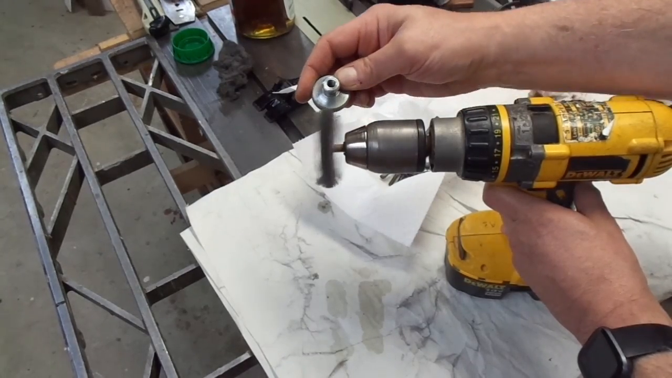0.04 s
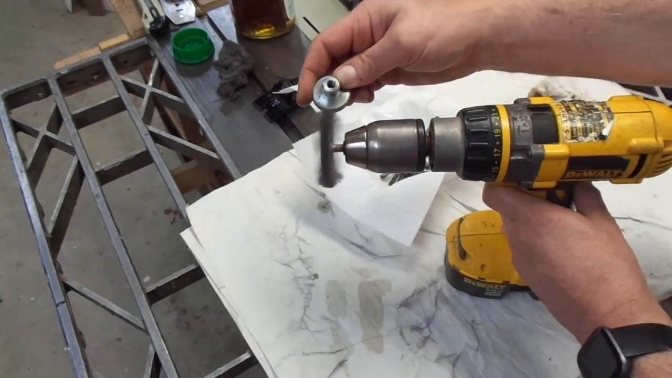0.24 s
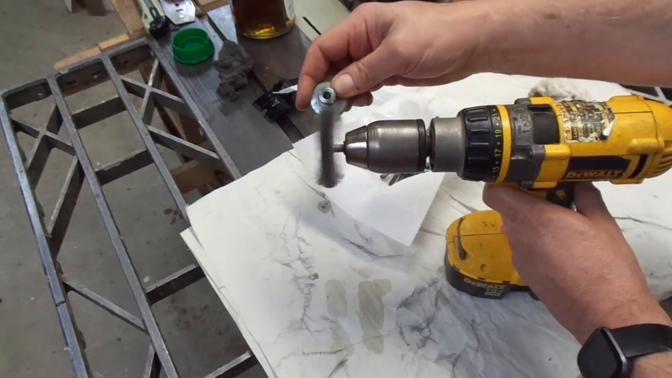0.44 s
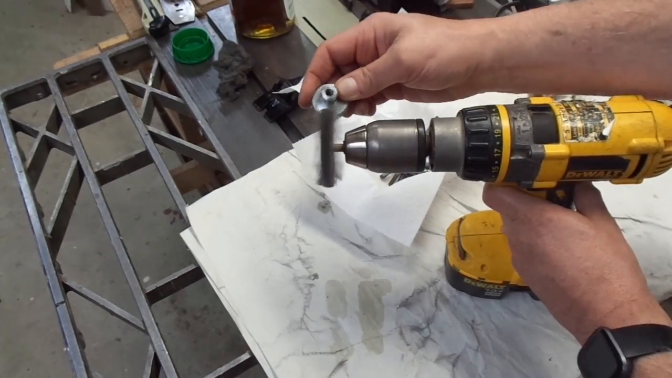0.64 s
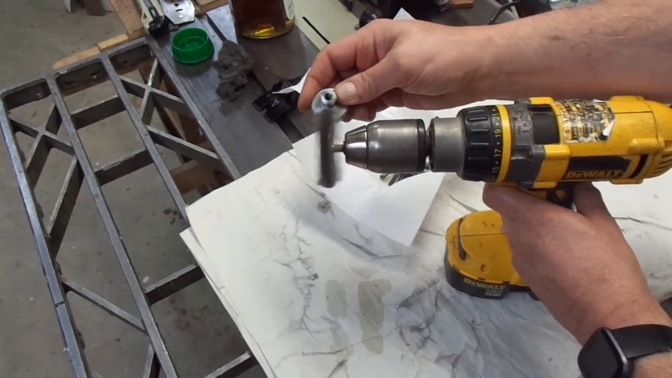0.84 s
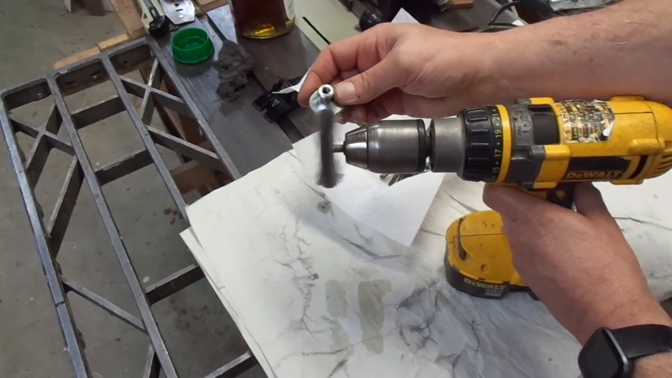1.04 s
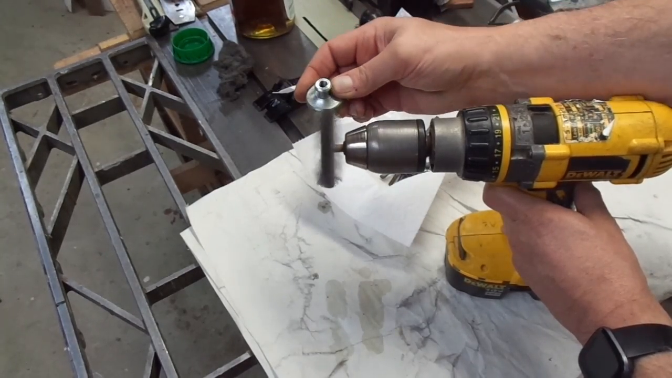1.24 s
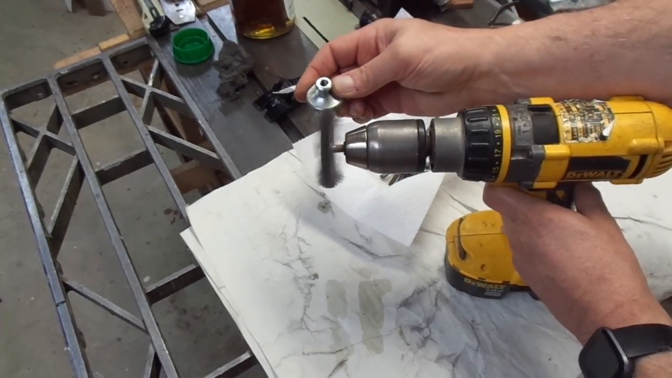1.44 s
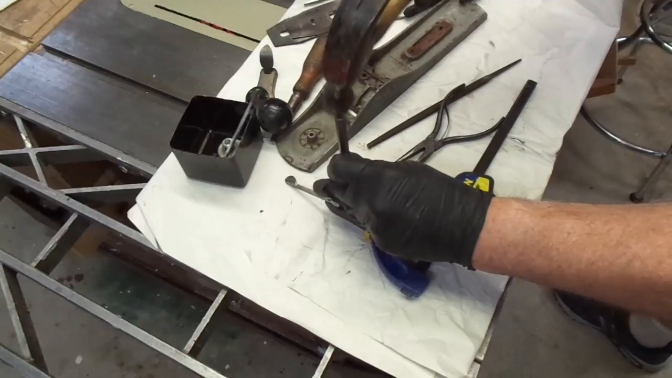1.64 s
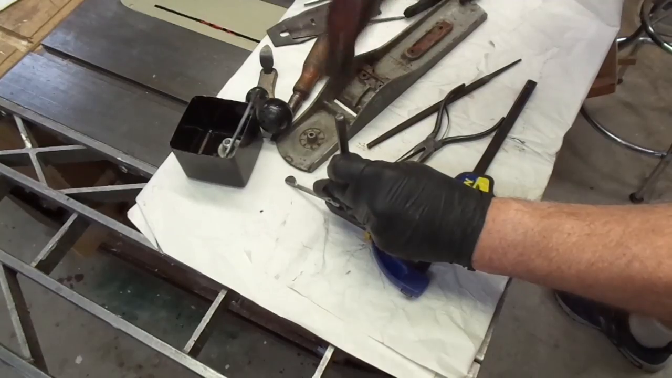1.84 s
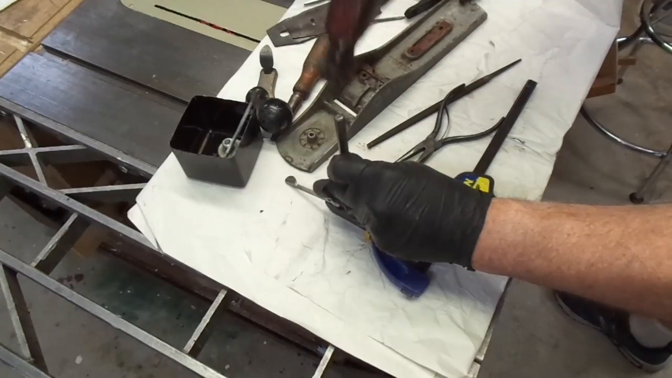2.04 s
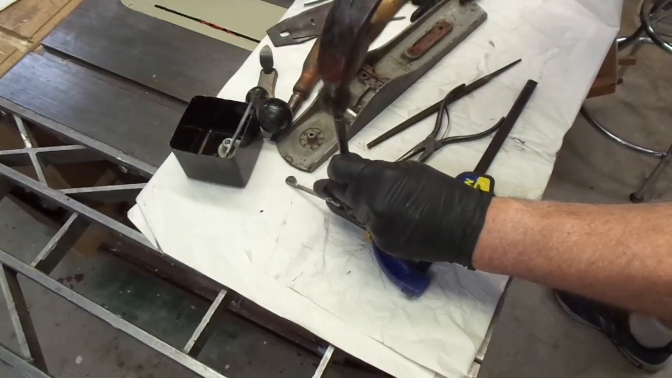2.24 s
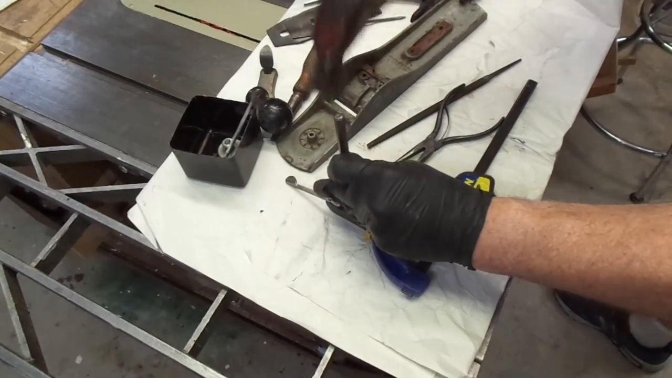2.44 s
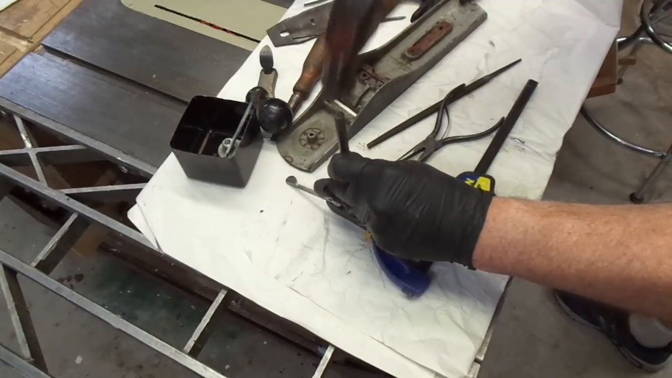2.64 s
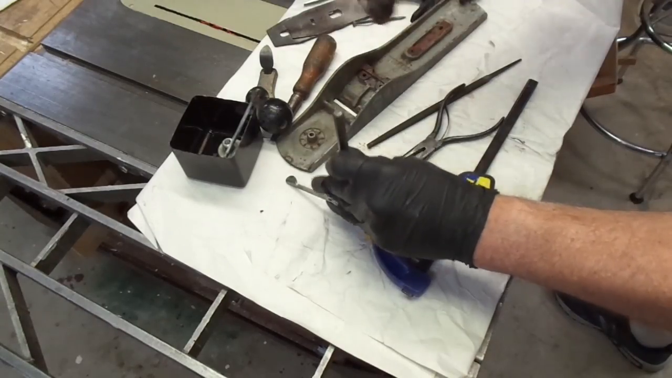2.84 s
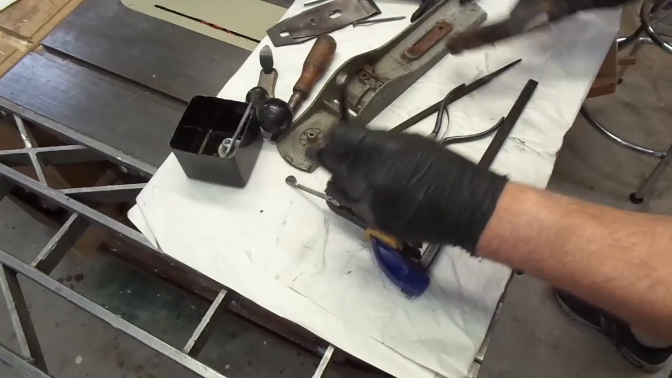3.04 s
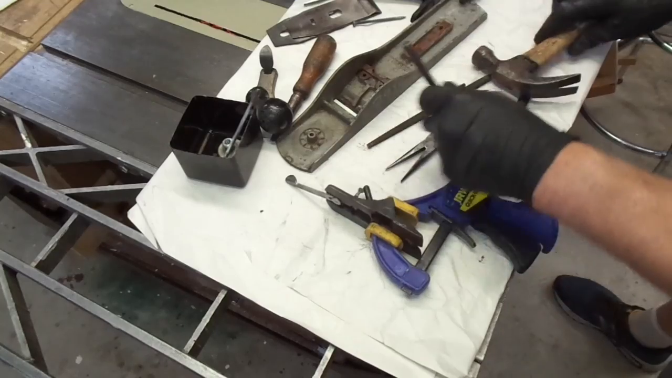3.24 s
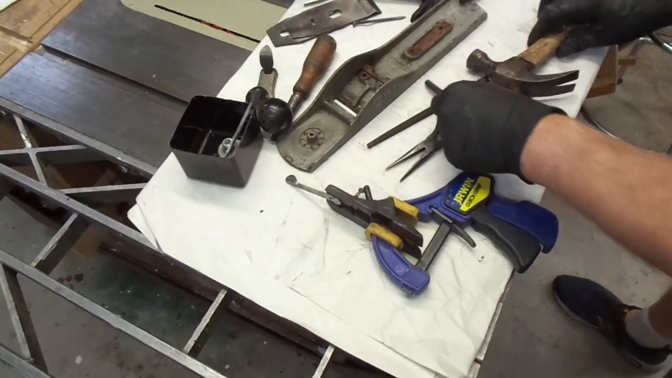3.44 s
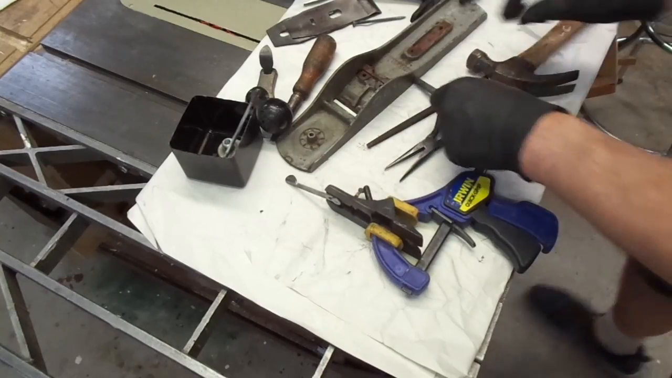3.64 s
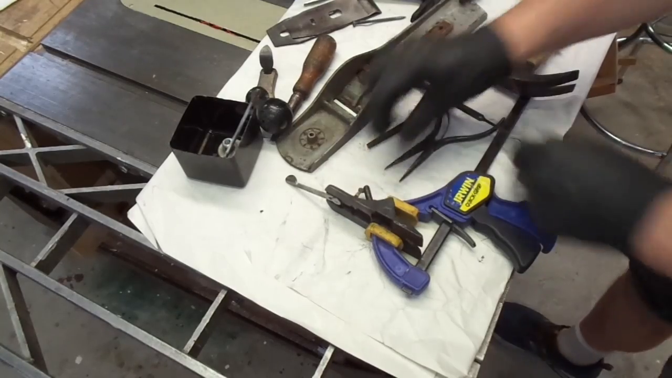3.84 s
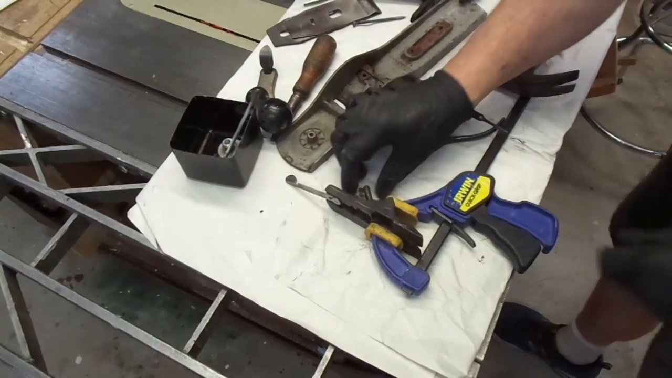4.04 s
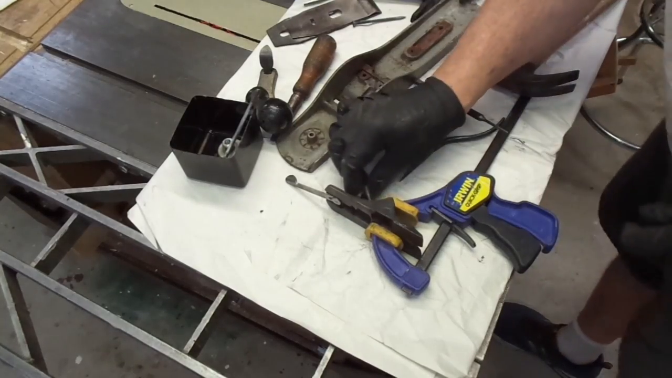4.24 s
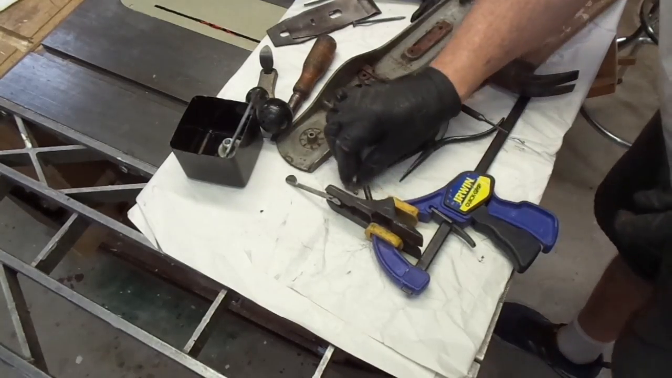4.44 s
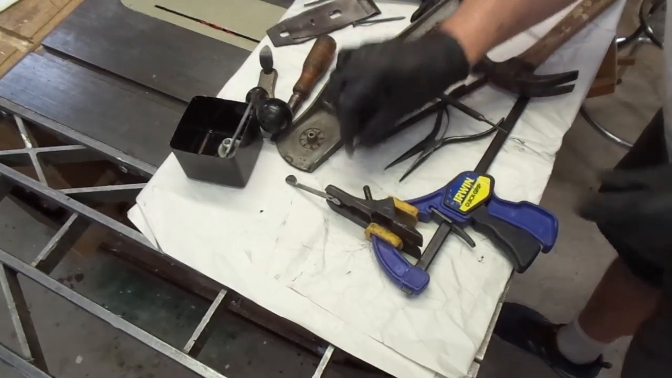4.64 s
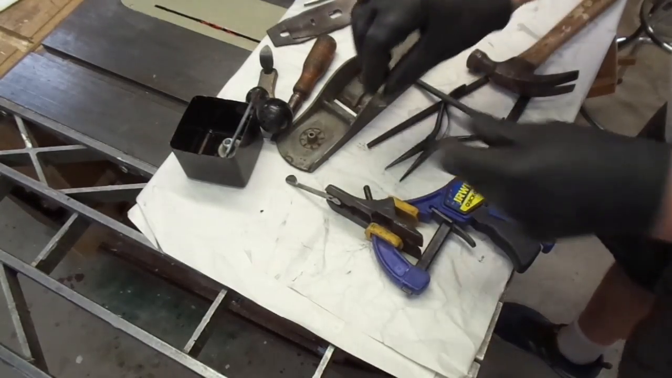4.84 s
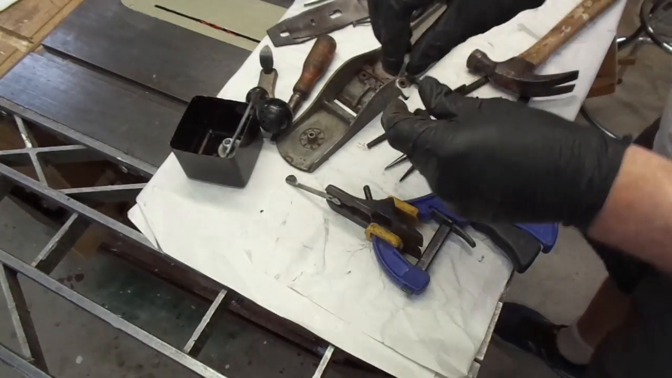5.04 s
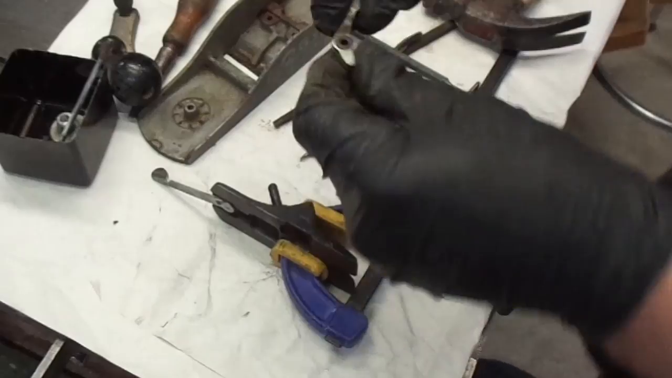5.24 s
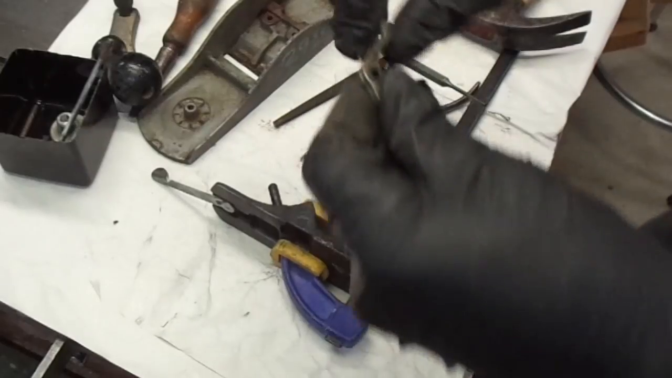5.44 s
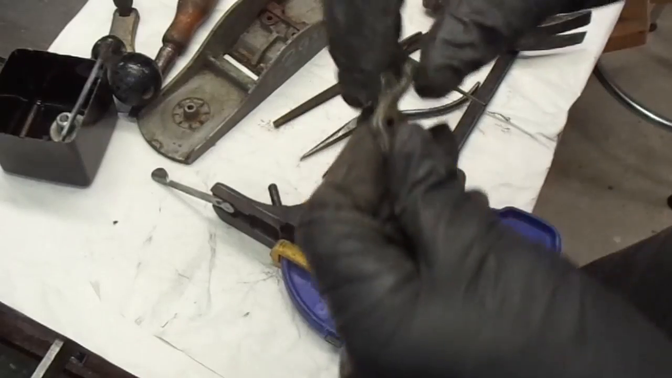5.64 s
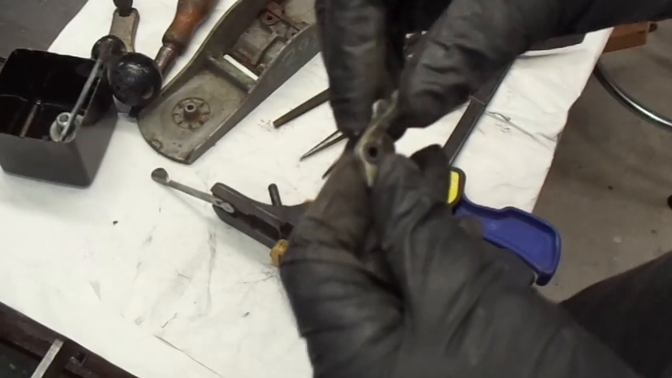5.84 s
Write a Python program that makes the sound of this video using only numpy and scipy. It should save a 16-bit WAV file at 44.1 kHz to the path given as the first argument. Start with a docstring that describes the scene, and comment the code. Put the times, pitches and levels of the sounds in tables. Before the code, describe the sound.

A cordless drill scrubs a wire brush on steel and fades, then four ringing hammer blows and a clatter of tools on a workbench.

```python
"""Wire brush and hammer in a workshop

A cordless drill spins a wire brush against a small steel part and fades away: friction gives noise,
the gears give tones. Four hammer blows on a punch excite damped modes in the steel, the workbench and
the tools lying on it. Tools clink as they are handled, and gloves rub softly over a background hiss."""
import sys
import numpy as np
from scipy import signal
from scipy.fft import rfft, irfft, next_fast_len
from scipy.io import wavfile
from scipy.ndimage import uniform_filter1d, map_coordinates

SR = 44100
rng = np.random.default_rng(int(sys.argv[2]) if len(sys.argv) > 2 else 0)


def transcribe(signal):
    """Save signal, clipped to [-1, 1], as a 16-bit WAV file at the path in sys.argv[1]."""
    frames = np.atleast_2d(signal).T
    limited = np.clip(frames, -1, 1)
    pcm = np.round(limited * 32767).astype(np.int16)
    wavfile.write(sys.argv[1], SR, pcm)


N = 260631
T = np.arange(N) / SR
HIT_T = np.arange(SR) / SR

# The motor slows as the brush is pressed harder. Each row: time in seconds, motor tone in Hz.
MOTOR_TONE = [(0, 1026), (.38, 1021), (.55, 978), (.72, 972), (.93, 934), (1.02, 926), (1.1, 943),
              (1.55, 934)]
# Tones of motor and gears. Each row: multiple of the motor tone, level in dB.
GEAR_LINES = [(.354, -6), (.444, -1.5), (.621, 0), (.71, -1), (1.001, 5), (1.089, -1.5), (1.164, -3.5),
              (1.33, -2), (1.72, -6), (1.999, 1), (2.447, -8), (2.645, -3.5), (3.08, 1), (3.77, -4.5),
              (4.07, -7)]
# Wire scrubbing steel. Each row: frequency in Hz, spectral level in dB.
SCRUB_SPECTRUM = [(40, -46), (80, -24.5), (170, -17.5), (250, -19.5), (380, -12), (600, 0.5), (900, -2.5),
                  (1130, 0), (1400, 1), (1520, -11), (2500, -1.5), (3300, -3.5), (5300, -0.5), (6500, -0.5),
                  (11000, -5.5), (15000, -8.5)]
# Resonances of brush and part. Each row: centre in Hz, width in octaves, gain in dB.
PART_RESONANCES = [(1116, 0.06, 4), (1810, 0.027, 3), (2584, 0.041, 5)]
# The brush skips. Each row: time in seconds, half-length in seconds, drop in dB, whine sag in Hz.
BRUSH_SKIPS = [(.366, .009, 13, 35), (.43, .011, 9, 0), (.559, .007, 11, 0), (.656, .016, 24, 100),
               (.87, .006, 1, 90), (1.008, .009, 12, 30), (1.049, .007, 12, 100)]

# Background noise, central and diffuse. Each row: frequency in Hz, spectral level in dB.
BACKGROUND_SPECTRUM = [(25, -0.5), (60, -13.5), (130, -7.5), (300, -6), (520, -3), (750, -6.5), (1150, -4),
                       (1650, -10), (3600, -14), (6000, -16.5), (10000, -16), (15000, -19)]
DIFFUSE_SPECTRUM = [(24, -38), (40, -8), (81, -16), (372, -6), (499, -2.5), (2850, -18.5), (5790, -33),
                    (14000, -23.5)]
# The low background noise and the high hiss each go quiet briefly, then return.
# Each holds start, end, fall and return in seconds, then depth in dB.
LOW_NOISE_LULL = (4.47, 5.21, 0.28, 0.017, 15.4)
HIGH_HISS_LULL = (3.67, 4.47, 0.3, 0.19, 12)
# A notch slides down through the background noise. Each row: time in seconds, centre in Hz, depth in dB.
SLIDING_NOTCH = [(3.65, 1150, 1), (3.85, 1070, 10.5), (4.25, 860, 13), (4.5, 610, 11), (4.75, 449.5, 3)]

# Hammer blows. Each row: start in seconds, level in dB, gains in dB of the ring, the treble and the
# 8.7 kHz ping, favoured frequency in Hz, its boost in dB, gain around 5.5 kHz in dB.
HAMMER_BLOWS = [(1.599, -12, -3, 8, 6, 1950, 1.5, -1), (1.904, -13, -4.5, 7.5, 6, 1710, -0.5, 0),
                (2.2038, -10, -7, -4, -6, 1280, 2, 3), (2.515, -11.5, -5, -4, -14, 4120, 0, 5)]
# Modes of the punch with hammer and work piece, of the tools on the bench, of the clamp let go, of the
# hammer laid down and of a small steel tool. Each row: frequency in Hz, level in dB, t60 in seconds.
PUNCH_MODES = [(385, -8, .22), (516, -1, .27), (740, -2.5, .26), (784, -3, .3), (896, -1.5, .3),
               (966, -5, .2), (1250, -4, .2), (1650, -6, .15), (1744, -8, .25), (1852, -2, .16),
               (2046, -3, .17), (2899, 4.5, .16), (3004, -2.5, .2), (3200, -2, .08), (3288, 5.5, .13),
               (3520, -7, .1), (4270, -8, .15), (4680, -10, .2), (8698, 3, .13), (8830, -10, .15),
               (9520, -13, .17), (10000, -16, .17), (12350, -7, .045), (12770, -4, .13), (13140, -7, .1)]
TOOL_MODES = [(441, -1.5, 1.15), (611, -4, .9), (677, -2.5, .9), (904, -2, .9), (1136, -3, .65),
              (1534, 3, .66), (1723, -8, .6), (1981, -7, .5), (2078, -2, .7), (2390, 3, .68)]
CLAMP_MODES = [(380, -8, .2), (670, 3, .18), (895, 3, .2), (1110, -4, .14), (1250, 7, .19), (1480, -1, .15),
               (1610, -1, .17), (1740, 2, .25), (1990, 1, .2), (2085, -3, .55), (2900, -3, .14)]
KNOCK_MODES = [(150, -16, .3), (225, -17, .3), (335, -10, .36), (405, -4, .16), (462, 2, .14),
               (587, -13, .24)]
SMALL_TOOL_MODES = [(2960, 1, .07), (3120, -1, .06), (4760, -17, .11), (7144, -14, .14), (9146, -7, .11),
                    (11100, -9, .11), (11820, -10, .08)]
# Stereo spread, one list for each blow or object. Each row: lower band edge in Hz, interaural phase in rad.
BLOW_PHASES = [
    [(0, 0), (440, -.9), (650, 0), (2200, -2.1), (2450, -1.2), (2750, 0), (3500, .8), (7000, 2.8),
     (9400, .7)],
    [(0, .9), (440, -.7), (650, -.2), (1400, -1), (1900, -.4), (3500, -2), (5300, -2.8), (11000, -.6)],
    [(0, 1.2), (330, .5), (600, 1.5), (1150, .8), (1480, -.6), (2100, -2.1), (2500, -2.9), (3050, -1),
     (3550, -2.2), (4700, -1.5)],
    [(0, .5), (430, 2.3), (650, .3), (1000, 2.7), (1450, .7), (1800, 1.1), (2350, 2.4), (2700, 1.4),
     (3050, 0), (3480, 1.5)],
]
CLAMP_PHASES = [(0, 2.5), (1180, 3.05), (1400, 1.8), (1880, .8), (2040, 1.9), (2800, .9)]
KNOCK_PHASES = [(0, 1.8), (300, .5)]
SMALL_TOOL_PHASES = [(0, .35), (8000, .1)]
# The bench under a blow and under a tool put down. Each row: frequency in Hz, spectral level in dB.
THUD_SPECTRUM = [(30, -31.5), (70, -26), (130, -7.5), (230, -11), (330, -3.5), (620, -3), (850, 1.5),
                 (1200, -7), (1900, -6), (2500, -7), (3300, -4), (5500, -17), (10000, -24), (15000, -26.5)]
THUMP_SPECTRUM = [(40, -35), (100, -14), (170, -2), (260, -11), (400, 3), (520, 2.5), (700, -2.5),
                  (2000, -32), (6000, -53)]
# Damping of the thud. Each row: frequency in Hz, t60 in seconds.
THUD_DECAY = [(100, 0.41), (800, 0.4), (2000, 0.32), (4000, 0.27), (8000, 0.23), (14000, 0.041)]
# Tools touch down. Each row: start in seconds, clack level in dB, centre in Hz, width in octaves,
# t60 in seconds, side relative to mid in dB, thump level in dB.
TOOL_CONTACTS = [(2.922, -54, 760, 0.81, 0.14, -6, -44), (3.142, -21.5, 1680, 0.57, .15, 0.5, -32.5),
                 (3.198, -34, 1840, .15, 0.2, -2, -60), (3.228, -31, 2030, 0.73, 0.12, 0, -52),
                 (3.238, -24.5, 3900, 0.85, 0.078, -2, -32), (3.45, -25, 2800, 0.69, .06, -4, -56),
                 (3.454, -25, 8500, 0.5, 0.058, -9, -77), (3.629, -42.5, 3300, 0.39, .11, -4, -57),
                 (3.662, -49, 2180, 0.78, 0.36, -4, -75), (3.69, -48, 3220, .3, 0.086, 0, -79),
                 (3.768, -53.5, 720, 0.12, 0.11, 0, -73), (3.92, -54.5, 3500, 0.73, 0.4, -1, -78),
                 (4.108, -48, 1900, 0.96, 0.076, 0, -75)]
# Clamp, hammer and small tool are set ringing. Each holds start in seconds, level in dB.
CLAMP_ONSET = (3.144, -25)
KNOCK_ONSET = (3.245, -29)
SMALL_TOOL_ONSET = (3.452, -19)

FADE_FROM_S, DRILL_END_S = 0.49, 1.574


def amp(db):
    """Decibels to amplitude ratio."""
    return 10 ** (np.asarray(db) / 20)


def unit(x):
    """Normalisation to rms 1."""
    return x / np.sqrt(np.mean(x ** 2) + 1e-20)


def along(points, hz):
    """Interpolation of (Hz, value) points on a log-frequency axis."""
    f, v = np.transpose(points)
    return np.interp(np.log(hz + 1), np.log(f + 1), v)


def bell(hz, centre_hz, octaves):
    """A Gaussian peak of height 1 on a log-frequency axis."""
    return np.exp(-.5 * (np.log2((hz + 1) / centre_hz) / octaves) ** 2)


def ramp(start_s, length_s):
    """A linear rise from 0 to 1, then held."""
    return np.clip((T - start_s) / length_s, 0, 1)


def soft_onset(seconds):
    """A soft onset: each hit rises to full level within a few milliseconds."""
    return np.clip(HIT_T / seconds, 0, 1) ** 2.5


def decay(t60):
    """Exponential damping: 60 dB down in t60 seconds."""
    return amp(-60 * HIT_T / t60)


def wobble(rate, size=N):
    """Smooth random modulation, rate knots a second."""
    return map_coordinates(rng.standard_normal(int(size * rate / SR) + 4), [np.arange(size) * rate / SR])


def filtered(x, response):
    """Linear filtering: the spectrum times a frequency response."""
    size = x.shape[-1]
    m = next_fast_len(size + 8192)
    return irfft(rfft(x, m) * response(np.fft.rfftfreq(m, 1 / SR)), m)[..., :size]


def noise(colour, size=N):
    """Spectrally shaped Gaussian noise of rms 1."""
    return unit(filtered(rng.standard_normal(size), colour))


def wide_noise(colour, side_db):
    """A second of stereo noise; an independent side signal decorrelates the ears."""
    mid, side = noise(colour, size=SR), amp(side_db) * noise(colour, size=SR)
    return unit(np.array([mid + side, mid - side]))


def crowded(hz):
    """Modal overlap: random peaks and valleys in dB, deeper in the treble."""
    knots = rng.standard_normal(SR // 140)
    return map_coordinates(knots, [hz / 90]) * np.interp(hz, [500, 5000], [2, 4.5])


def spread(x, bands):
    """Interaural phase differences widen a sound that is equally loud at both ears."""
    from_hz, rad = np.transpose(bands)
    phase = lambda hz: uniform_filter1d(rad[np.searchsorted(from_hz, hz, "right") - 1], size=60)
    return filtered(x, lambda hz: np.exp(1j * np.array([[.5], [-.5]]) * phase(hz)))


def add(track, s, sound):
    """Superposition of a sound on the track from time s."""
    start = round(s * SR)
    track[:, start:start + sound.shape[1]] += sound[:, :N - start]


def skips(catch_s=.01, sag_lag_s=0.0074, sag_width_s=0.028):
    """Loss of contact: friction drops, the whine sags as the load eases, and the wires catch again."""
    skip_db = catch_db = sag_hz = 0
    for s, half_s, drop_db, hz in BRUSH_SKIPS:
        skip_db += drop_db * np.exp(-((T - s) / half_s) ** 8)
        catch_db += .08 * drop_db * np.exp(-((T - s - half_s - catch_s) / catch_s) ** 2)
        sag_hz += hz * np.exp(-((T - s - sag_lag_s) / sag_width_s) ** 2)
    return skip_db, catch_db, sag_hz


def part_db(hz):
    """Resonance of brush and part lifts nearby frequencies, in dB."""
    return sum(db * bell(hz, centre_hz, octaves) for centre_hz, octaves, db in PART_RESONANCES)


def brush(cycles, skip_db, catch_db):
    """Friction of wire tips drives the steel with noise, modulated once a revolution by the uneven brush."""
    bite = amp(.35 * np.sin(2 * np.pi * cycles / 45) + .5 * wobble(28) + 1.1 * wobble(500))
    high = lambda hz: 1 / (1 + (5900 / (hz + 1)) ** 30)
    steel = lambda hz: amp(along(SCRUB_SPECTRUM, hz) + part_db(hz) + 0.26 * crowded(hz))
    scrub = amp(-28 - .6 * skip_db) * noise(lambda hz: steel(hz) * (1 - high(hz)))
    fizz = amp(-35.5 - skip_db) * noise(lambda hz: steel(hz) * high(hz))
    return bite * amp(catch_db) * (scrub + fizz)


def gears(cycles, motor_hz):
    """Forced vibration: each gear tone follows the motor and swells as it crosses a resonance."""
    out = np.zeros(N)
    for k, db in GEAR_LINES:
        level_db = -41 + db + part_db(k * motor_hz) + 2.6 * wobble(22.03)
        out += amp(level_db) * np.sin(2 * np.pi * k * cycles + 0.67 * wobble(24.88))
    return out


def buzz(cycles, motor_hz, turns_per_cycle=.0888, scatter_db=2.5):
    """A rattle that repeats at each turn of the gear train forms a harmonic series, uneven and wavering."""
    out = np.zeros(N)
    size = round(DRILL_END_S * SR)
    for harmonic in range(4, 48):
        ratio = harmonic * turns_per_cycle
        uneven_db, phase = scatter_db * rng.standard_normal(), rng.random()
        level_db = along(SCRUB_SPECTRUM, ratio * motor_hz[0]) + uneven_db + 3 * wobble(11.9, size=size)
        out[:size] += amp(level_db) * np.sin(2 * np.pi * (ratio * cycles[:size] + phase))
    return out / out[:size].std()


def whine(motor_hz, sag_hz, light_load_hz=4806):
    """Frequency modulation by load: the controller's tone rises as the motor slows."""
    hz = light_load_hz + 2.1 * (motor_hz[0] - motor_hz) - sag_hz
    return amp(-27.5 + 1.7 * wobble(89.1)) * np.sin(2 * np.pi * np.cumsum(hz + 23 * wobble(130)) / SR)


def drill():
    """One rotation paces brush and gears; the fan adds narrow-band noise and the controller a whine."""
    motor_hz = np.interp(T, *np.transpose(MOTOR_TONE))
    cycles = np.cumsum(motor_hz * (1 + 0.0025 * wobble(41.35))) / SR
    skip_db, catch_db, sag_hz = skips()
    scrubbing = brush(cycles, skip_db, catch_db)
    hum = gears(cycles, motor_hz)
    rattle = amp(-34 - .3 * skip_db) * buzz(cycles, motor_hz)
    fan = amp(-38.5) * noise(lambda hz: bell(hz, 5220, 0.1))
    fade = 1 - ramp(FADE_FROM_S, DRILL_END_S - FADE_FROM_S)
    controller = fade ** 0.066 * whine(motor_hz, sag_hz)  # fades a little faster than the rest
    return fade * (scrubbing + hum + rattle + fan + controller)


def lull(from_s, to_s, fall_s, return_s, depth_db):
    """An envelope in dB that sinks, stays down and returns."""
    return -depth_db * ramp(from_s, fall_s) * (1 - ramp(to_s - return_s, return_s))


def notched(x, octaves=.19):
    """A time-varying band-stop filter slides a hollow down the spectrum."""
    hz, t, z = signal.stft(x, SR, nperseg=1024)
    s, centre_hz, depth_db = np.transpose(SLIDING_NOTCH)
    cut_db = np.interp(t, s, depth_db) * bell(hz[:, None], np.interp(t, s, centre_hz), octaves)
    return signal.istft(z * amp(-cut_db), SR, nperseg=1024)[1][:N]


def background(swell_from_s=4.99, narrow_at_s=5.21):
    """Broadband noise follows the drill: three central bands swell late, as an antiphase part drops out."""
    swelling_s = np.maximum(T - swell_from_s, 0)
    low = lambda hz: 1 / (1 + (hz / 800) ** 8)
    high = lambda hz: 1 - 1 / (1 + (hz / 6000) ** 8)
    band = lambda power: noise(lambda hz: amp(along(BACKGROUND_SPECTRUM, hz)) * np.sqrt(power(hz)))
    low_noise = amp(-64.5 + 7.5 * swelling_s + lull(*LOW_NOISE_LULL)) * band(low)
    middle = amp(-60.5 + 6 * swelling_s) * band(lambda hz: (1 - low(hz)) * (1 - high(hz)))
    hiss = amp(-66 + 4 * swelling_s + lull(*HIGH_HISS_LULL)) * band(high)
    width = 1 - ramp(narrow_at_s, 0.016)
    diffuse = amp(-59.5) * width * noise(lambda hz: amp(along(DIFFUSE_SPECTRUM, hz)))
    return (T > DRILL_END_S) * (notched(low_noise + middle + hiss) + np.array([[1], [-1]]) * diffuse)


def ring(modes, scatter_db, waver_rad, colour=np.zeros_like):
    """Free vibration: damped modes, new in strength at each impact; reflections make their phase waver."""
    out = np.zeros(SR)
    for hz, db, t60 in modes:
        phase = 2 * np.pi * (hz * HIT_T + rng.random()) + waver_rad * wobble(34, size=SR)
        out += amp(db + colour(hz) + scatter_db * rng.standard_normal()) * decay(t60) * np.sin(phase)
    return out


def thud(colour):
    """Frequency-dependent damping: of the bench's dense resonances, the treble dies first."""
    burst = noise(lambda hz: amp(along(THUD_SPECTRUM, hz) + colour(hz) + crowded(hz)), size=SR)
    hz, t, z = signal.stft(burst, SR, nperseg=256)
    damping = amp(-60 * t / along(THUD_DECAY, hz)[:, None])
    return signal.istft(z * damping, SR, nperseg=256)[1][:SR]


def hammer(attack_s=0.0078, direct_s=0.0067):
    """Impact excitation: a blow rings the punch and the steel faces, and through the bench the tools."""
    out = np.zeros((2, N))
    # the direct sound stands out for a moment before the room takes over
    attack = soft_onset(attack_s) * (1 + np.exp(-HIT_T / direct_s))
    for blow, bands in zip(HAMMER_BLOWS, BLOW_PHASES):
        s, db, ring_db, treble_db, ping_db, favoured_hz, boost_db, bite_db = blow
        # where the face lands decides which resonances speak
        colour = lambda hz: (treble_db * bell(hz, 15000, 0.31) + boost_db * bell(hz, favoured_hz, .3)
                             + bite_db * bell(hz, 5500, 0.5))
        with_ping = lambda hz: colour(hz) + ping_db * bell(hz, 8700, .12)
        crack = amp(7.5) * decay(0.01) * noise(lambda hz: bell(hz, 3300, 1.3), size=SR)
        snap = amp(-7) * decay(.055) * noise(lambda hz: bell(hz, 13000, .16), size=SR)
        dense_modes = noise(lambda hz: bell(hz, 10800, 0.18) * amp(crowded(hz)), size=SR)
        faces = amp(-15 + treble_db) * decay(0.17) * dense_modes
        punch = amp(ring_db) * ring(PUNCH_MODES, scatter_db=1.5, waver_rad=.6, colour=with_ping)
        tools = amp(-19) * ring(TOOL_MODES, scatter_db=1.2, waver_rad=.25)
        bench = amp(2) * thud(colour)
        add(out, s, spread(amp(db) * attack * (crack + snap + faces + punch + tools + bench), bands))
    return out


def clacks(attack_s=0.0057, thump_lag_s=0.00697, room_top_hz=4050):
    """Light impacts: a tool clacks, the bench thumps, and absorption dulls the room's reverberation."""
    out = np.zeros((2, N))
    rise = soft_onset(attack_s)
    for s, db, centre_hz, octaves, t60, side_db, thump_db in TOOL_CONTACTS:
        peak = lambda hz: bell(hz, centre_hz, octaves) + amp(-19.5) * bell(hz, centre_hz, 0.95)
        clack = wide_noise(lambda hz: peak(hz) * amp(crowded(hz)), side_db)
        thump = wide_noise(lambda hz: amp(along(THUMP_SPECTRUM, hz) + crowded(hz)), side_db=5.5)
        dull = filtered(clack, lambda hz: 1 / np.hypot(1, (hz / room_top_hz) ** 2))
        tail = amp(-23.5) * decay(t60=1) * dull
        add(out, s, rise * amp(db) * (decay(t60) * clack + tail))
        add(out, s + thump_lag_s, rise * amp(thump_db) * decay(0.39) * thump)
    return out


def ringing_tools(attack_s=0.0057):
    """Natural modes sound as the clamp is let go, the hammer laid down and a small tool knocked."""
    out = np.zeros((2, N))
    for (s, db), modes, bands in [(CLAMP_ONSET, CLAMP_MODES, CLAMP_PHASES),
                                  (KNOCK_ONSET, KNOCK_MODES, KNOCK_PHASES),
                                  (SMALL_TOOL_ONSET, SMALL_TOOL_MODES, SMALL_TOOL_PHASES)]:
        add(out, s, spread(soft_onset(attack_s) * amp(db) * ring(modes, scatter_db=1, waver_rad=.6), bands))
    return out


def gloves():
    """Soft friction of rubber gloves on a small part excites two narrow resonances."""
    rub = noise(lambda hz: bell(hz, 4330, .08) + amp(6) * bell(hz, 2000, .07))
    return ramp(start_s=5.46, length_s=.09) * amp(-62 + wobble(25)) * rub


def scene():
    """Superposition of brushing, hammering and handling with the background noise."""
    return drill() + hammer() + clacks() + ringing_tools() + background() + gloves()


def record(dry, ceiling=.97, top_hz=15250):
    """Saturation rounds off the loudest blows, and a steep low-pass limits the bandwidth."""
    clipped = dry / (1 + np.abs(dry / ceiling) ** 6) ** (1 / 6)
    return filtered(clipped, lambda hz: 1 / np.hypot(1, (hz / top_hz) ** 110))


dry = scene()
out = record(dry)
transcribe(out)
```